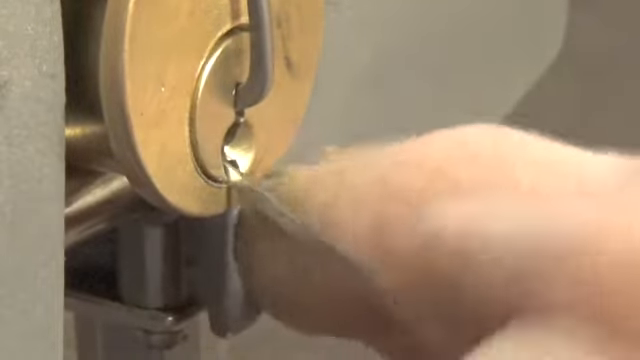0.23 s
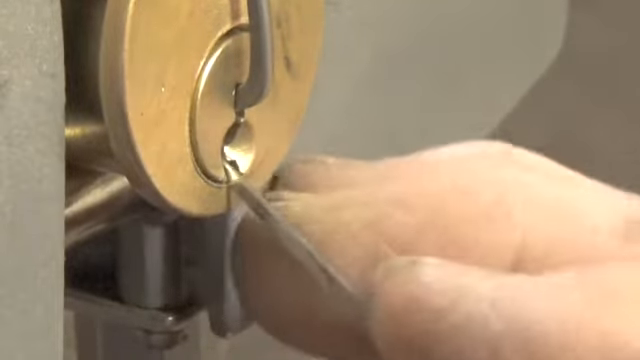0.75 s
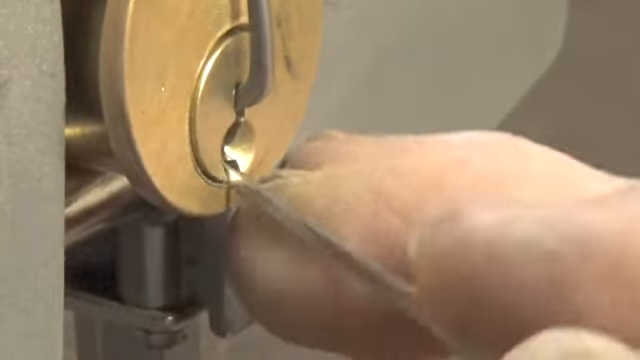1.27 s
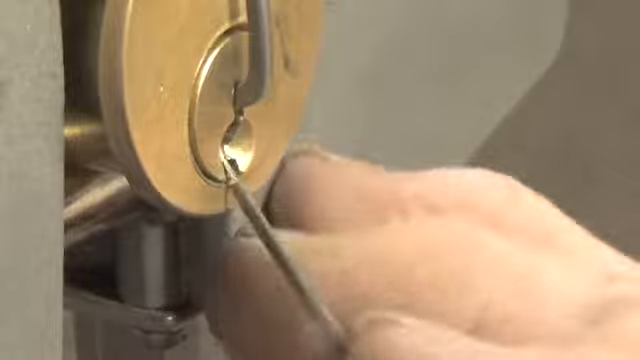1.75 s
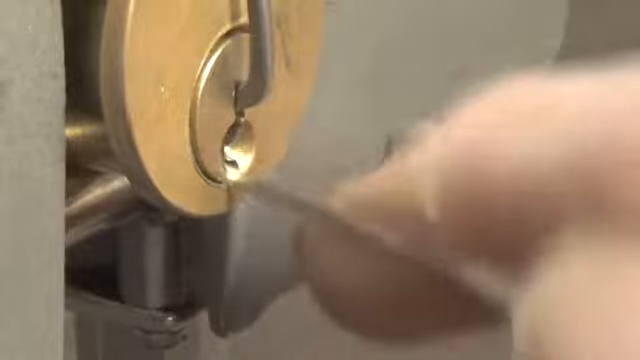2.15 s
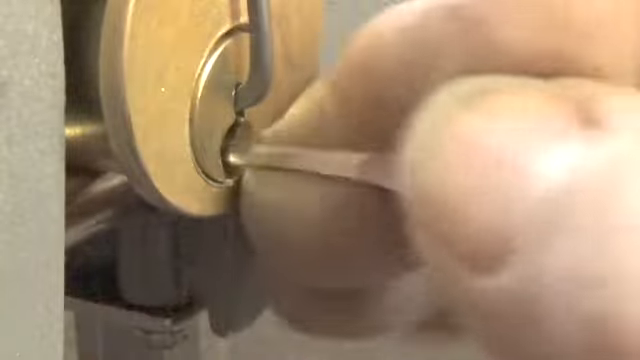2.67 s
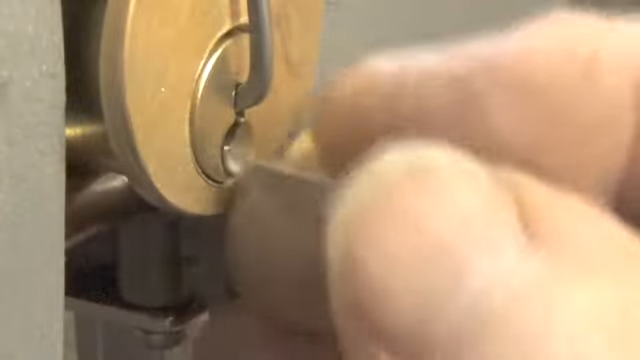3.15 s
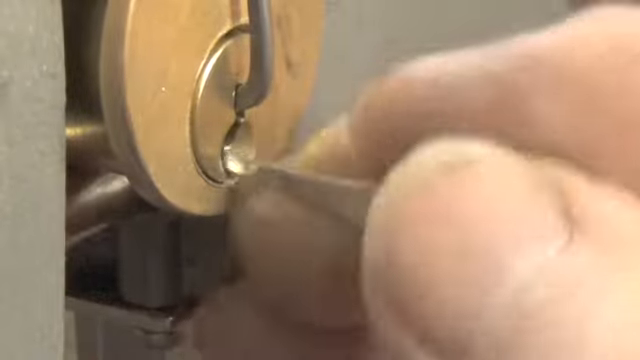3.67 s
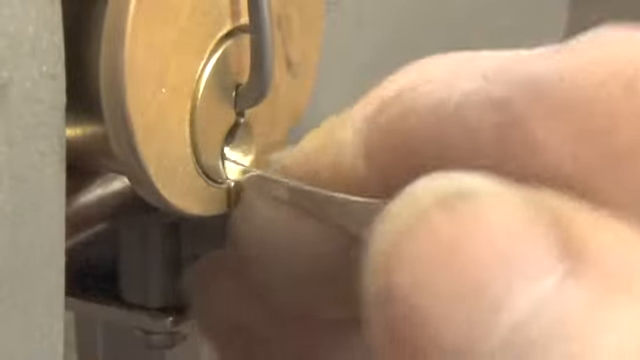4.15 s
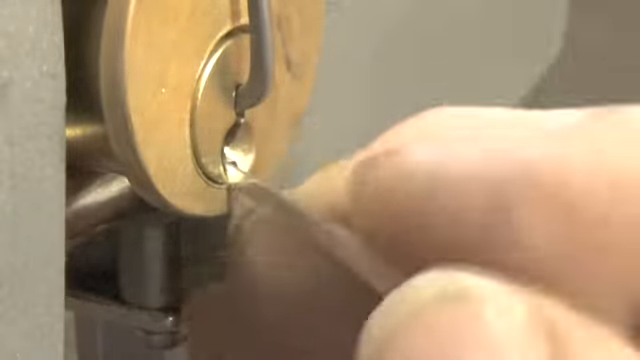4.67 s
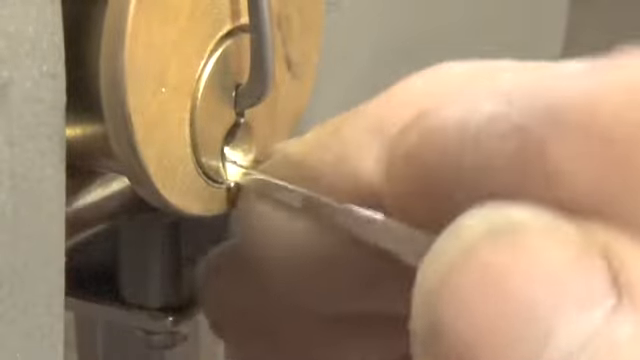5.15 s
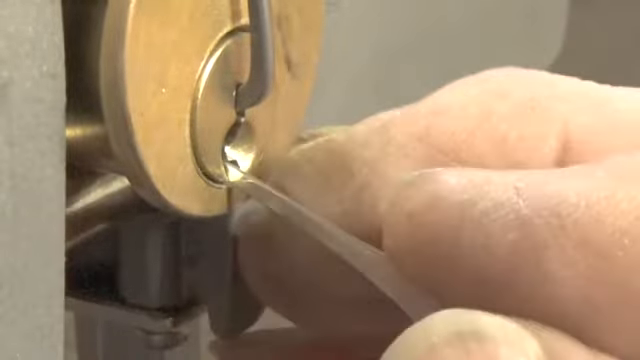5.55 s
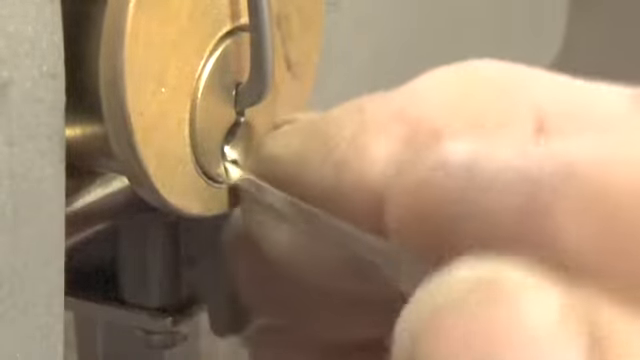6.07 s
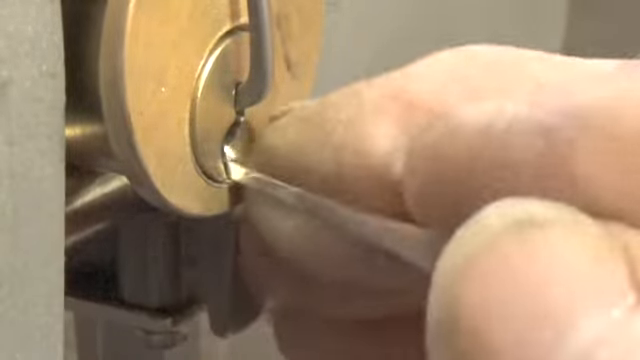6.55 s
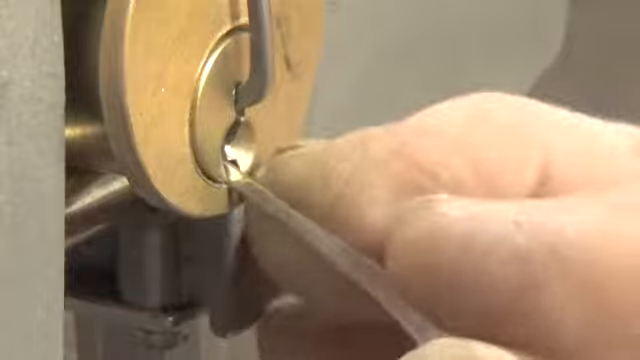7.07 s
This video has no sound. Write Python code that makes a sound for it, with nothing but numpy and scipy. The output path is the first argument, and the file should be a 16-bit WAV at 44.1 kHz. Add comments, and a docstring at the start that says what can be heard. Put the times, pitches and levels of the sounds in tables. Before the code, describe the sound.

Small dry metallic clicks and gritty scrapes, irregularly spaced, from a pick against spring-loaded pins. They start sparse, grow busy with sharp pinging snaps, reach a hard double clack, fall nearly quiet, then give one heavy snap and a few light ticks. The microphone is very close, with soft steady air hiss and slight indoor reflections.

```python
"""A small quiet room, with a brass lock cylinder worked by a steel pick close to the microphone.
Pins tick and snap back on their springs: noisy blows that ring the modes of lock and pick.
The pick scrapes along the keyway in stick-slip grains, and faint chance ticks fall in between.
Hard snaps thump the mounting, rubbing tools sound brief tones and the tension wrench hums once.
Each blow gets a short diffuse tail from the room, over steady air and microphone hiss."""
import sys
import numpy as np
from scipy import signal
from scipy.fft import rfft, irfft, next_fast_len
from scipy.io import wavfile

SR = 44100
rng = np.random.default_rng(int(sys.argv[2]) if len(sys.argv) > 2 else 0)


def transcribe(signal):
    """Save signal, clipped to [-1, 1], as a 16-bit WAV file at the path in sys.argv[1]."""
    frames = np.atleast_2d(signal).T
    limited = np.clip(frames, -1, 1)
    pcm = np.round(limited * 32767).astype(np.int16)
    wavfile.write(sys.argv[1], SR, pcm)


N = 322812

# colour of the steady air and hiss, before its overall level is set: pitch_hz, density_db_per_hz
HISS_COLOUR = [(15, -57), (25, -39), (48, -7.5), (87, -15), (166, -3), (206, -9.5), (309, -0.5), (463, -3),
               (560, -2.5), (607, -3.5), (659, -3), (1560, -4), (3250, -6.5), (14800, -17), (16000, -20)]
# how alike the hiss is at left and right: pitch_hz, correlation (0 to 1)
HISS_LIKENESS = [(60, 0.65), (180, 1), (550, 0.14), (1650, 0.014), (4970, 0.53), (15000, 1)]
# time the room takes to die by 60 dB: pitch_hz, t60_s
ROOM_DECAY = [(100, 0.96), (300, 0.32), (800, .36), (2000, 0.33), (5000, 0.36), (9000, 0.34), (14000, 0.07)]
# colour of the room's answer: pitch_hz, gain_db
ROOM_COLOUR = [(150, -2.0), (800, 7.0), (1500, -3.5), (4000, 0.0), (10000, -4.5), (15000, 2.5)]
# low resonances of the mounting: pitch_hz, width_hz, relative_db
THUD_MODES = [(118, 18, -11), (160, 28, -11), (237, 70, -7), (320.8, 47, 2), (391, 46, 1),
              (494.4, 36, -5.5)]
# higher, hollow resonances of the mounting: pitch_hz, width_hz, relative_db
HOLLOW_MODES = [(576, 24, -7.5), (737, 79, 0.5), (788, 55, 4), (886, 54, -1.5)]
# blows that shake the mounting, before the trims in thumps(): start_s, relative_thud_db, relative_hollow_db
THUMPS = [(0.876, -54, -54.5), (1.157, -71, -76), (1.713, -47.5, -58.5), (2.004, -71, -80),
          (2.485, -57.5, -68.5), (2.941, -54.5, -63), (3.765, -65.5, -82), (3.873, -53.5, -64.5),
          (4.649, -59, -68.5), (4.692, -53.5, -64.5), (4.739, -47, -53), (6.163, -49, -48),
          (6.383, -66, -66.5)]
# a rubbing squeak or a flexing wrench, level before fades: start_s, end_s, pitch_hz, width_hz, level_db
TOOL_TONES = [(4.592, 4.694, 1296, 90, -57.5), (4.86, 5.1, 305, 45.3, -68.5),
              (6.709, 6.794, 1403, 110, -66)]
# the pick drags along the keyway, level before a common trim: start_s, end_s, relative_db
SCRAPES = [(0.266, 0.378, -55.5), (2.202, 2.231, -61.5), (2.233, 2.274, -47.5), (2.465, 2.487, -61.5),
           (2.587, 2.605, -52), (2.615, 2.682, -58.5), (2.736, 2.813, -51), (2.797, 2.932, -57.5),
           (3.195, 3.314, -58), (3.339, 3.402, -58.5), (3.632, 3.698, -47.5), (3.731, 3.798, -54),
           (4.152, 4.24, -55.5), (4.24, 4.336, -60), (4.466, 4.508, -60), (4.6, 4.641, -55.5),
           (4.64, 4.674, -42), (4.919, 5.052, -61.5), (6.371, 6.39, -52), (6.717, 6.793, -67)]
# tilt of the scraping: pitch_hz, gain_db
SCRAPE_TILT = [(60, -22.5), (500, -7.0), (1400, -5.0), (4000, 0.0), (9500, -0.5), (12000, 0.5), (16000, -7.0)]
# resonances of lock and pick: pitch_hz, width_hz, relative_db
LOCK_MODES = [(1270, 77, 0.5), (1432, 97, -1.5), (1533, 100, 0.5), (2010, 150, -18), (2192, 165, -5),
              (2420, 170, -4), (2676, 220, -13), (3665, 37, 1), (4205, 130, -1), (4660, 61, -3.5),
              (4986, 150, -5), (5574, 197, -2), (6147, 100, -9), (7100, 91, -15), (6900, 240, -14),
              (7640, 130, -7.5), (8096, 290, -7.5), (8810, 218, -6.5), (9334, 90, -0.5), (9570, 110, -12),
              (9840, 170, -2), (10620, 360, -7.5), (11170, 190, -7.5), (12030, 300, -15.5),
              (12400, 570, -12.5), (14900, 300, -22.5)]
# colour of the unpitched crack of metal on metal: pitch_hz, relative_db
CRACK_COLOUR = [(600, -3), (1000, -5), (1500, -4), (2300, -1), (3100, -4.5), (4000, -2), (5700, -2.5),
                (6700, -4.5), (10800, -5), (12500, -15), (16000, -23.5)]
# the pick meets a pin, or a pin snaps back; brightness is ting over knock:
# start_s, strength_db, brightness_db, knock_hz, ting_hz
CLICKS = [(0.2828, -55.5, 0, 1460, 9200), (0.331, -52.5, 5.5, 2110, 9000), (0.49, -74, -21, 1600, 9200),
          (0.6026, -61.5, 9.5, 1630, 10400), (0.8755, -46, -13, 1500, 9900), (0.973, -56, 5, 1810, 8600),
          (1.159, -57.5, 4, 1570, 9150), (1.504, -56.5, 3, 1554, 9320), (1.713, -28.5, 18, 2180, 8330),
          (1.7515, -43.5, 9, 1950, 9400), (2.004, -59.5, 8, 1905, 8800), (2.149, -54.5, 12, 2510, 9140),
          (2.238, -50, 5, 1820, 9700), (2.259, -54, 12, 1900, 9100), (2.3255, -52.5, -1, 1490, 9900),
          (2.3529, -47.0, 1, 1500, 10400), (2.4842, -44.5, 5, 1850, 10300), (2.5305, -59, 12, 1650, 8400),
          (2.5999, -45.5, 17.5, 2640, 9600), (2.662, -58.0, 20, 2150, 9500), (2.741, -53, 13, 1500, 9500),
          (2.759, -49.5, 18.5, 2200, 8800), (2.8319, -53, 8.5, 2100, 9700), (2.9295, -40, 0.5, 1490, 9700),
          (2.9407, -28.5, 13, 2340, 9200), (3.1742, -63.5, -5, 1500, 9400), (3.242, -73.5, 12, 1400, 9400),
          (3.3775, -44.5, -4.5, 1960, 10130), (3.6162, -56.5, 1, 2350, 10400),
          (3.6612, -48, 21.5, 2340, 10350), (3.674, -47.5, 23.5, 2400, 10100),
          (3.7373, -54.0, 20, 2050, 9600), (3.765, -46, 2, 1560, 9000), (3.8739, -25, 12, 1980, 11100),
          (4.1459, -54.5, 13, 1900, 8230), (4.18, -52.5, 13, 1350, 8800), (4.248, -59, 17.5, 2100, 8390),
          (4.285, -53, 16, 2150, 8600), (4.4689, -52, 18, 2300, 8900), (4.592, -45.5, 7.5, 1340, 10000),
          (4.6495, -43, 6.5, 1350, 10400), (4.6917, -25.5, 4, 1670, 9220), (4.739, -26, 5, 1470, 11100),
          (4.9434, -49.5, -1.5, 2080, 8200), (5.013, -52, 13.5, 2270, 8950), (5.0722, -50.5, 8, 2400, 9800),
          (5.2324, -51, 11.5, 1800, 8200), (5.9643, -63.5, 4.5, 1750, 8700),
          (6.054, -65.5, 5.5, 1450, 9400), (6.1626, -24, 5.5, 1500, 10800), (6.3831, -43, 4.5, 1820, 10000),
          (6.433, -57.5, 5, 1450, 9200), (6.7809, -44.5, 9.5, 1990, 10000), (6.913, -56, -19.5, 1800, 7880)]
# knock, clack and ting: low_hz, high_hz
REGISTERS = [(850, 3000), (3000, 7000), (7000, 17000)]

# a pin settles with a second tick; its level is SETTLE_DB after a click of SETTLE_REF_DB,
# and moves SETTLE_FOLLOWS dB for each dB of click
SETTLE_CHANCE, SETTLE_S, SETTLE_SPREAD_S = 0.6, 0.017, 0.005
SETTLE_DB, SETTLE_REF_DB, SETTLE_FOLLOWS = -59, -43, 0.8
# a dragging pick catches on the wards: ticks a second, level over the scrape's table level, brightness
CATCH_PER_S, CATCH_DB, CATCH_BRIGHT_DB = 22, -4.5, 13
# the hand is never quite still: faint stray ticks at any time
STRAY_PER_S, STRAY_DB, STRAY_BRIGHT_DB = 1.5, -67, -6.5
# catches and strays: level spread either way (brightness spreads twice as far), and their pitches
TICK_SCATTER_DB, TICK_KNOCK_HZ, TICK_TING_HZ = 2, 1700, 9450

RING = 8192  # samples in one blow
HZ = np.fft.rfftfreq(RING, 1 / SR)
T = np.arange(RING) / SR


def amp(db):
    """Decibels to gain."""
    return 10 ** (np.asarray(db) / 20)


def unit(x):
    """Scale to rms 1."""
    return x / np.sqrt(np.mean(x ** 2) + 1e-20)


def along(points, hz):
    """Read (pitch_hz, value) points on a log frequency axis."""
    f, v = np.transpose(points)
    return np.interp(np.log(hz + 1), np.log(f), v)


def add(track, s, sound):
    """Mix a sound into a track at s seconds."""
    part = track[..., max(round(s * SR), 0):][..., :sound.shape[-1]]
    part += sound[..., :part.shape[-1]]


def filtered(x, response):
    """Shape x by a function of frequency."""
    m = next_fast_len(N + SR // 2)
    spectrum = rfft(x, m) * response(np.fft.rfftfreq(m, 1 / SR))
    return irfft(spectrum, m)[..., :N]


def band(x, lo_hz, hi_hz):
    """Causal band-pass."""
    sos = signal.butter(N=3, Wn=[lo_hz, hi_hz], btype="band", fs=SR, output="sos")
    return signal.sosfilt(sos, x)


def body(modes, hz, scatter_db):
    """Causal response of damped resonances; each call weights them anew, as a new point of contact does."""
    gains = amp(scatter_db * rng.standard_normal(len(modes)))
    response = 0
    for k, (centre, width, db) in enumerate(modes):
        resonance = 1j * hz * width / (centre ** 2 - hz ** 2 + 1j * hz * width)
        response = response + (-1) ** k * gains[k] * amp(db) * resonance
    return response


def chatter(length_s, first):
    """A blow of extra force `first`, amid tiny random rebounds that die away."""
    force = rng.standard_normal(RING) * np.exp(-(T / length_s) ** 2)
    force[0] += first
    return force


def hiss(level_db=-65.5):
    """Steady room air and microphone hiss: coloured noise, partly shared by left and right."""
    def split(hz):
        # this angle between mid and side gives the wanted left-right correlation
        angle = np.arccos(np.clip(along(HISS_LIKENESS, hz), -1, 1)) / 2
        return amp(along(HISS_COLOUR, hz)) * [np.cos(angle), np.sin(angle)]

    mid, side = filtered(rng.standard_normal((2, N)), split)
    return amp(level_db) * unit(np.array([mid + side, mid - side]))


def room(x, wet_db, width, build_s=0.0021):
    """A diffuse tail of reflections that builds up quickly and dies soonest in the high treble."""
    hz, t, cells = signal.stft(rng.standard_normal((2, SR // 2)), SR, nperseg=256)
    decay = amp(-60 * t / along(ROOM_DECAY, hz)[:, None])
    tail = signal.istft(cells * decay, SR, nperseg=256)[1]
    tail *= 1 - np.exp(-(np.arange(tail.shape[1]) / SR / build_s) ** 2)
    wet = signal.fftconvolve(x[None], tail / np.linalg.norm(tail[0]), axes=1)[:, :N]
    mid, side = filtered(wet, lambda f: amp(wet_db + along(ROOM_COLOUR, f)))
    return np.array([mid + width * side, mid - width * side])


def thumps(thud_db=-1, hollow_db=-2, push_db=-8, push_half_cycle_s=0.0014):
    """The heavy mounting answers lower and longer than the pins, after one dull push."""
    out = np.zeros(N)
    early = 2200  # samples over which each ring's level is set
    push = np.sin(np.pi * np.minimum(T / push_half_cycle_s, 2)) * amp(-60 * T / 0.026)
    for s, thud, hollow in THUMPS:
        for modes, db in (THUD_MODES, thud + thud_db), (HOLLOW_MODES, hollow + hollow_db):
            force = chatter(length_s=0.053, first=44)
            ring = irfft(rfft(force) * body(modes, HZ, scatter_db=1.5))
            ring = band(ring, modes[0][0] * 0.7, modes[-1][0] * 2.5)
            add(out, s + 0.001, amp(db) * ring / np.std(ring[:early]))
        add(out, s, amp(thud + push_db) * push)
    return out


def tool_tones():
    """Narrow, unsteady tones that swell and fade while a tool rubs or flexes."""
    out = np.zeros(N)
    for start, end, pitch_hz, width_hz, db in TOOL_TONES:
        n = max(int((end - start) * SR), 2)
        noise = rng.standard_normal(N)
        tone = filtered(noise, lambda hz: np.exp(-((hz - pitch_hz) / width_hz) ** 2))[:n]
        add(out, start, amp(db) * unit(tone) * signal.windows.tukey(n, 0.6))
    return out


def scrapes(slips_hz=330, spread_db=6, rub=0.05, level_db=-1):
    """The pick sticks and slips on the brass: dense uneven grains ring the lock's modes."""
    force = np.zeros(N)
    for start, end, db in SCRAPES:
        n = max(int((end - start) * SR), 2)
        slips = (rng.random(N) < slips_hz / SR) * amp(spread_db * rng.uniform(-1.6, 1, N))
        grains = (slips + rub * rng.standard_normal(N))[:n]
        add(force, start, amp(db) * unit(grains) * signal.windows.tukey(n, 0.3))

    def brass(hz):
        ringing = body(LOCK_MODES, hz, scatter_db=3.5)
        return amp(along(SCRAPE_TILT, hz)) * (ringing + 0.73 * amp(along(CRACK_COLOUR, hz)))

    return amp(level_db) * np.std(force) * unit(filtered(force, brass))


def small_ticks():
    """Chance contacts, as rows like CLICKS: pins settling, the pick catching on wards, stray touches."""
    rows = []
    for (s, db, *colour), (chance, late) in zip(CLICKS, rng.random((len(CLICKS), 2))):
        if chance < SETTLE_CHANCE:
            settle_s = s + SETTLE_S + SETTLE_SPREAD_S * (2 * late - 1)
            settle_db = SETTLE_DB + SETTLE_FOLLOWS * (db - SETTLE_REF_DB)
            rows.append((settle_s, settle_db, *colour))
    spans = [(start, end, CATCH_PER_S, db + CATCH_DB, CATCH_BRIGHT_DB) for start, end, db in SCRAPES]
    spans.append((0, N / SR, STRAY_PER_S, STRAY_DB, STRAY_BRIGHT_DB))
    for start, end, rate, db, bright_db in spans:
        count = round(rate * (end - start))
        for k, (when, size, tint) in enumerate(rng.random(size=(64, 3))[:count]):
            # one tick at a random moment in each equal share of the span
            tick_s = start + (end - start) * (k + when) / count
            tick_db = db + TICK_SCATTER_DB * (2 * size - 1)
            tick_bright_db = bright_db + 2 * TICK_SCATTER_DB * (2 * tint - 1)
            rows.append((tick_s, tick_db, tick_bright_db, TICK_KNOCK_HZ, TICK_TING_HZ))
    return rows


def contacts(rows, crack_db=-4.5, knock_width_hz=420, knock_peak_db=6,
             ting_width_hz=1300, ting_peak_db=6, lead_db=-24):
    """Contacts chatter into the lock's modes; brightness tips the balance from low knock to high ting."""
    out = np.zeros(N)
    attack, lead = 350, 200  # samples: where the level is set, and the slide before the blow
    for s, strength_db, bright_db, knock_hz, ting_hz in rows:
        def favour(hz):
            # the point of contact on the pick favours one part of the knock and one of the treble
            knock = knock_peak_db * np.exp(-((hz - knock_hz) / knock_width_hz) ** 2)
            return knock + ting_peak_db * np.exp(-((hz - ting_hz) / ting_width_hz) ** 2)

        modes = [(hz, width, db + favour(hz)) for hz, width, db in LOCK_MODES]
        force = chatter(length_s=0.0043, first=7.2)
        ring = irfft(rfft(force) * body(modes, HZ, scatter_db=1.0))
        grit = irfft(rfft(rng.standard_normal(RING)) * amp(favour(HZ) + along(CRACK_COLOUR, HZ)))
        crack = grit * amp(-60 * T / 0.028)
        blow = ring + amp(crack_db) * crack
        levels_db = strength_db + np.array([-bright_db / 2, 0, bright_db / 2])
        for db, edges in zip(levels_db, REGISTERS):
            part, slide = band(np.array([blow, grit]), *edges)
            add(out, s, amp(db) * part / np.std(part[:attack]))
            # the pin starts to slide just before it lets go
            swell = np.linspace(0, 1, lead) ** 2
            add(out, s - lead / SR, amp(db + lead_db) * unit(slide)[-lead:] * swell)
    return out


def ports(x, side_db=-18):
    """Scatter from hand and microphone body reaches the two ports with opposite sign."""
    size = 96  # samples
    scatter = rng.standard_normal(size) * np.hanning(size)
    side = amp(side_db) * signal.fftconvolve(x, scatter / np.linalg.norm(scatter))[:N]
    return np.array([x + side, x - side])


def scene():
    """The lock sits just in front of the two microphone ports, with the room around it."""
    air = hiss()
    mount = thumps() + tool_tones()
    metal = scrapes() + contacts(small_ticks()) + contacts(CLICKS)
    tails = room(mount, wet_db=-11.5, width=0.2) + room(metal, wet_db=-14, width=0.4)
    return air + tails + mount + ports(metal)


def record(dry, top_hz=16000):
    """The microphone falls away steeply above its band limit."""
    return filtered(dry, lambda hz: 1 / (1 + (hz / top_hz) ** 120))


dry = scene()
out = record(dry)
transcribe(out)
```